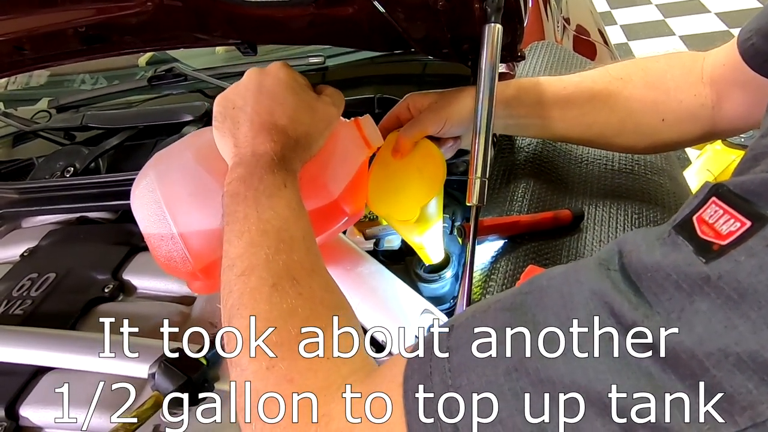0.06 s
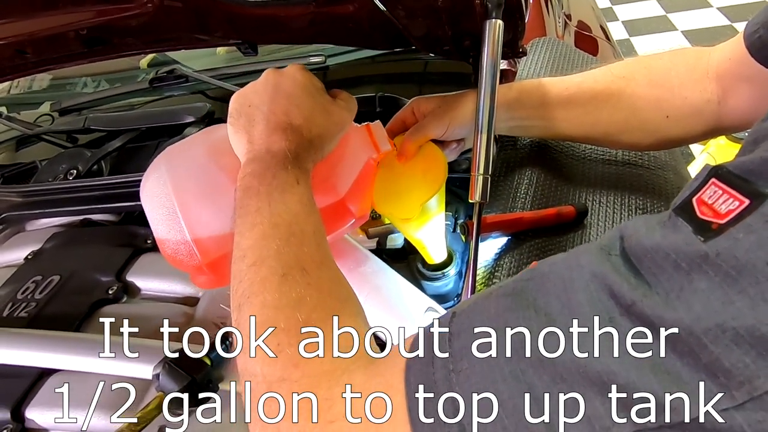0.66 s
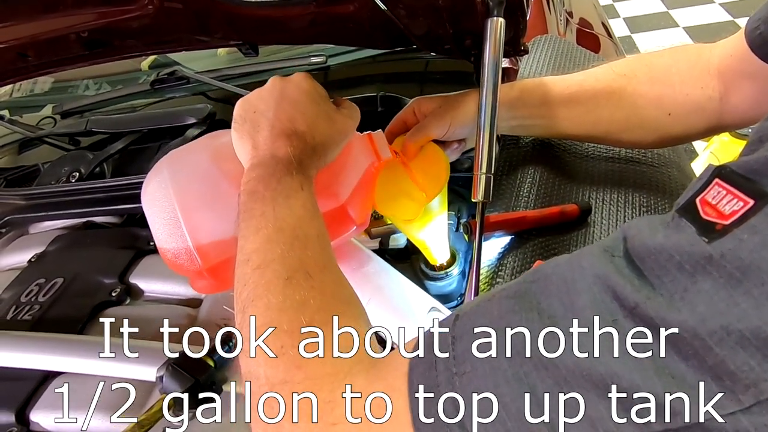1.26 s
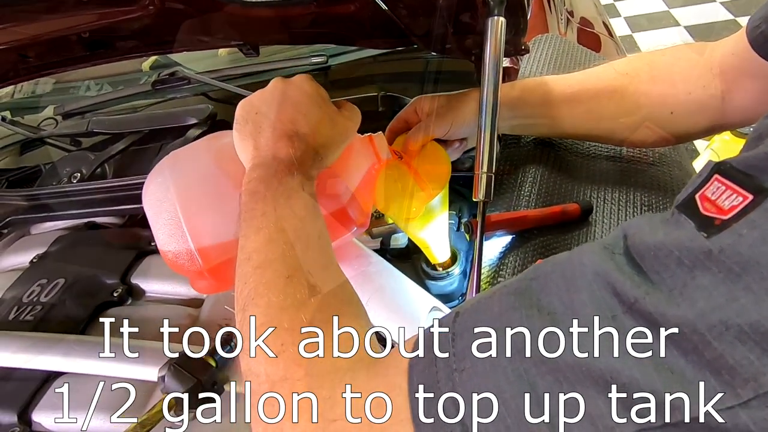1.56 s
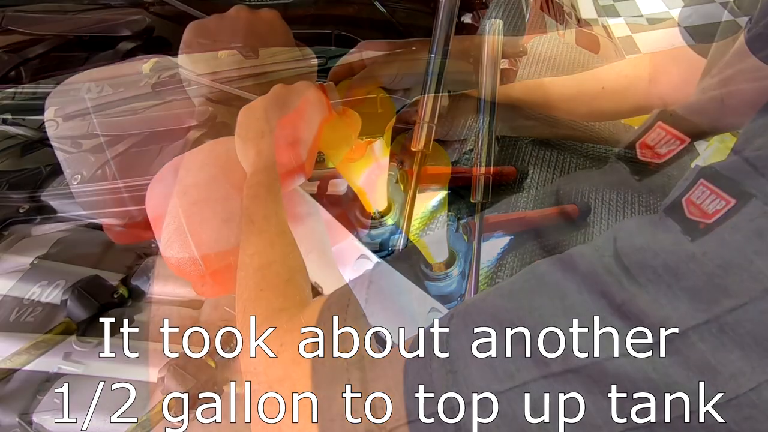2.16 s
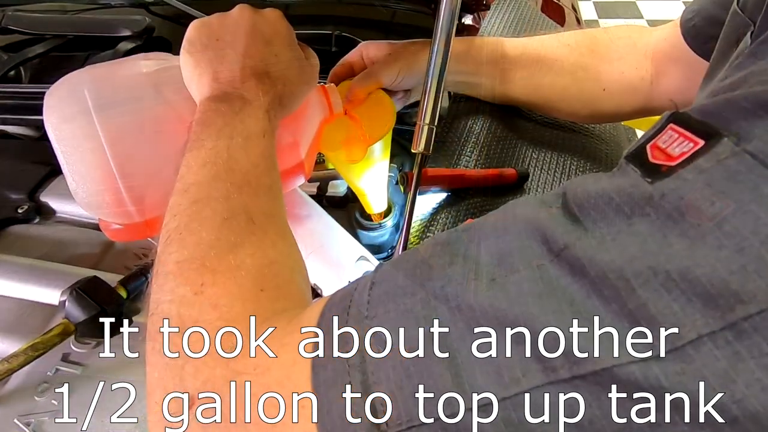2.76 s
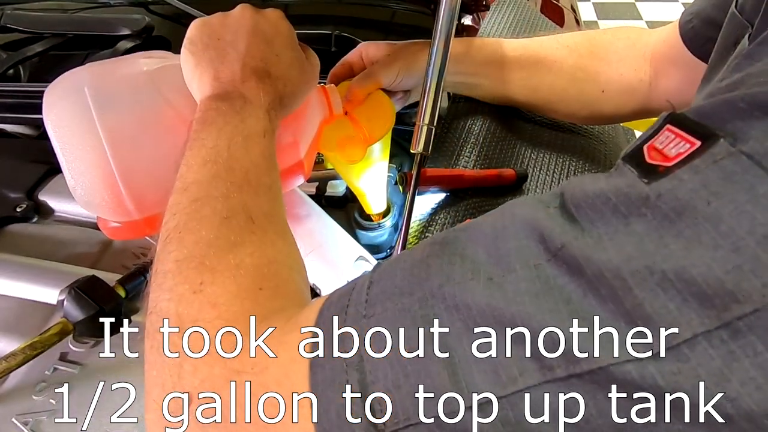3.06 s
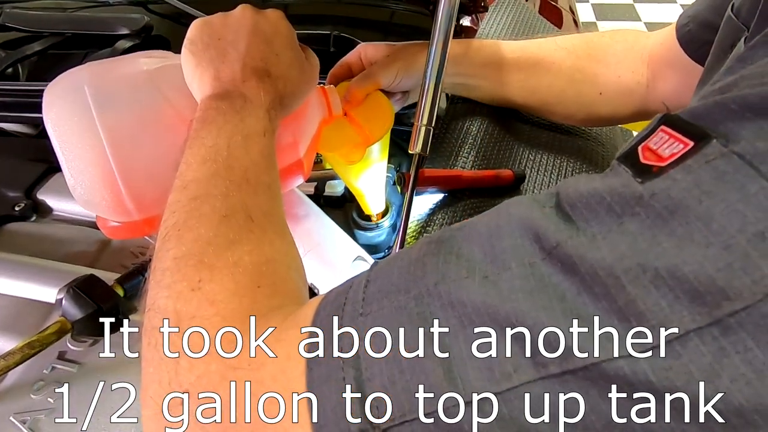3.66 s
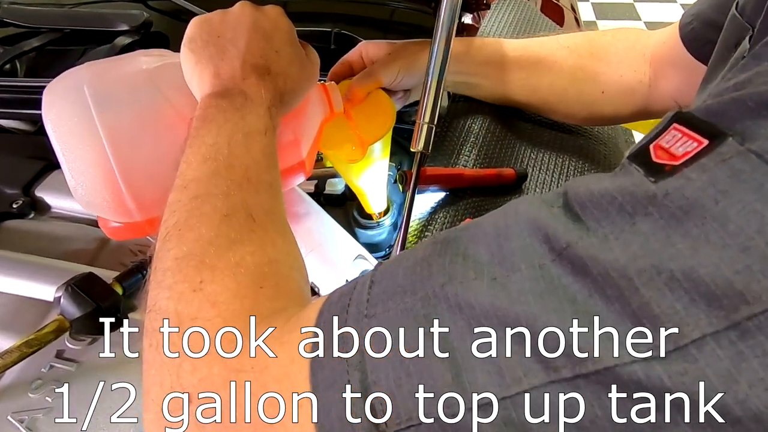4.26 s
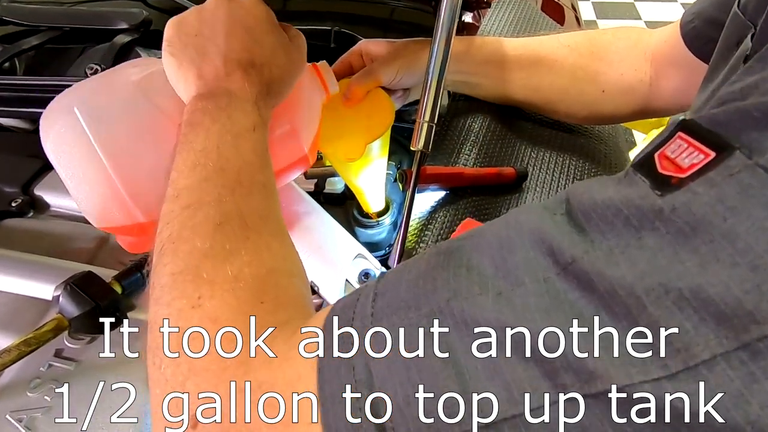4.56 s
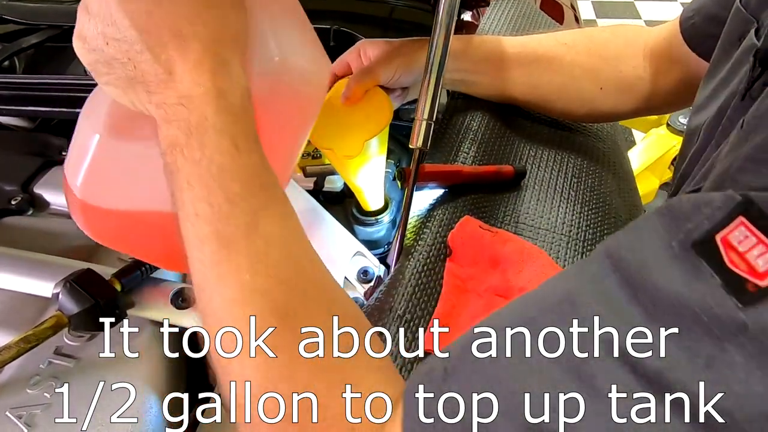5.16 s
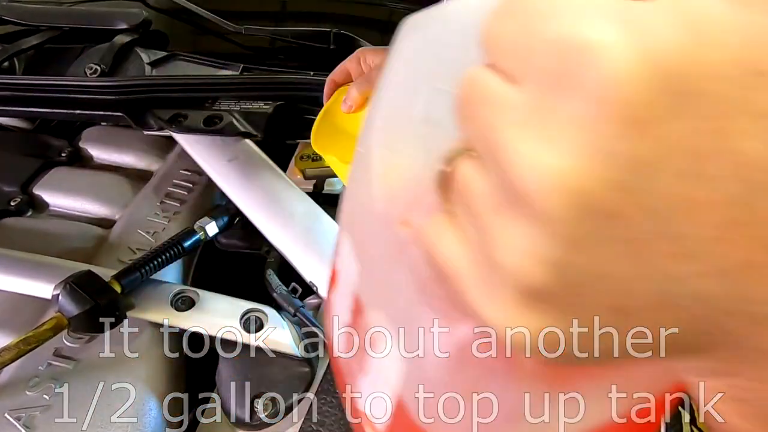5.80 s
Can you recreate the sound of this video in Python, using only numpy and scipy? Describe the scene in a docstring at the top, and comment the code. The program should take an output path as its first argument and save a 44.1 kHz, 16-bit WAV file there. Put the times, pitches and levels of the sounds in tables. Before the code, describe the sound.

Coolant pours through a plastic funnel with small splashes, bubbles and gulps of air, then dribbles out in a humming garage.

```python
"""Pouring coolant in a garage

In a humming garage, a plastic jug knocks on a funnel and coolant runs into an engine's tank.
The stream splashes and sheds small ringing bubbles, air gulps back up the filler neck,
and the hollow tank gurgles below. The pour ends in a few drips, a sleeve rubs,
and the jug bumps softly as it is lifted away."""
import sys
import numpy as np
from scipy import signal
from scipy.fft import rfft, irfft, next_fast_len
from scipy.io import wavfile
from scipy.ndimage import uniform_filter1d

SR = 44100
rng = np.random.default_rng(int(sys.argv[2]) if len(sys.argv) > 2 else 0)


def put_to_file(sound):
    """Save the sound as 16-bit audio at rate SR, in the file named by the first command-line argument."""
    columns = np.atleast_2d(sound).T  # one column per channel
    safe = np.clip(columns, -1, 1)
    whole_steps = np.round(safe * 32767)
    wavfile.write(sys.argv[1], SR, whole_steps.astype(np.int16))


N = 261591
TIME = np.arange(N) / SR
POUR_START_S, POUR_END_S = 1.095, 4.30


def from_db(db):
    """Turn decibels into a gain to multiply by."""
    return 10 ** (np.asarray(db) / 20)


def rms_one(x):
    """Scale a sound so that its average level (rms) is 1."""
    return x / np.sqrt(np.mean(x ** 2) + 1e-20)


def in_time(rows):
    """Join rows that start with a time into smooth curves, one for each further column."""
    s, *columns = np.transpose(rows)
    return [np.interp(TIME, s, column) for column in columns]


def at_hz(spectrum, hz):
    """Read the gain at any pitch from rows of pitch and dB."""
    row_hz, db = np.transpose(spectrum)
    return from_db(np.interp(np.log(hz + 1e-9), np.log(row_hz), db))


def colour(x, spectrum):
    """Make some pitches of a sound stronger than others; the level comes out at 1."""
    size = next_fast_len(N)
    gains = at_hz(spectrum, np.fft.rfftfreq(size, 1 / SR))
    return rms_one(irfft(rfft(x, size) * gains, size)[:N])


def noise(spectrum):
    """Smooth noise of a given colour."""
    return colour(rng.standard_normal(N), spectrum)


def add(track, s, sound):
    """Mix a sound into a track, starting at s seconds."""
    i = int(np.clip(s * SR, 0, len(track) - 1))
    track[i:i + len(sound)] += sound[:len(track) - i]


def ping(hz, t60, attack_s, rise=0):
    """A tone that fades by 60 dB in t60 seconds while its pitch climbs by the share `rise`."""
    t = np.arange(int(t60 * SR) + 8) / SR
    shape = (1 - np.exp(-(t / attack_s) ** 2)) * from_db(-60 * t / t60)
    return shape / shape.max() * np.sin(2 * np.pi * hz * t * (1 + .5 * rise * t / t60))


def swell(s, attack_s, hold_s, t60):
    """A loudness curve that rises, holds at 1 and dies away."""
    age = TIME - s
    rise = np.clip(age / attack_s, 0, 1) ** 2
    return rise * from_db(-60 * np.clip((age - attack_s - hold_s) / t60, 0, 3))


def wobble(spread_db, span_s):
    """A gain that wanders at random."""
    drift = uniform_filter1d(rng.standard_normal(N), int(span_s * SR))
    return from_db(spread_db * rms_one(drift))


def even(x, span_s):
    """Even out slow changes in loudness but keep the fine grain."""
    power = np.abs(uniform_filter1d(x ** 2, int(span_s * SR)))
    return x / np.sqrt(power + 0.00089 * np.mean(x ** 2))


def resonance(x, hz, width_hz):
    """Make a sound ring at one pitch; a narrower width rings longer."""
    r = np.exp(-np.pi * width_hz / SR)
    feedback = [1, -2 * r * np.cos(2 * np.pi * hz / SR), r * r]
    return signal.lfilter(np.array([1, 0, -1]) * (1 - r * r) / 2, feedback, x + 1e-18)


def gliding(x, hz, width_hz):
    """A resonance whose pitch follows a curve."""
    turn = np.exp(2j * np.pi * np.cumsum(hz) / SR)
    r = np.exp(-np.pi * width_hz / SR)
    return (turn * signal.lfilter([1 - r], [1, -r], x / turn)).real


def impacts(per_s, spread_db):
    """Clicks at random times: many small, a few large."""
    sizes = from_db(spread_db * np.minimum(rng.exponential(1, N), 4)) * rng.choice([-1, 1], N)
    return sizes * (rng.random(N) < per_s / SR)


# The colour of the ventilation. Each row: pitch in Hz, relative level in dB.
RUMBLE_COLOUR = [(18, -37), (30, -12), (40, -2), (80, -4.5), (125, -0.5), (170, -6.5), (240, -16.5),
                 (320, -19), (420, -34), (600, -39), (1000, -41.5), (1600, -51.5), (3000, -57.5),
                 (12500, -62), (14000, -81)]


def garage():
    """Ventilation rumbles, and a motor's hum sinks for a moment midway."""
    hum_hz, harmonics_db = 59.14, [-46.5, -55.5]
    hum = sum(from_db(db) * np.sqrt(2) * np.sin(2 * np.pi * (k * hum_hz * TIME + rng.random()))
              for k, db in enumerate(harmonics_db, 1))
    lull_s, lull_width_s, lull_db = 2.24, 0.5, -8
    lull = from_db(lull_db * np.exp(-((TIME - lull_s) / lull_width_s) ** 2))
    return lull * hum + from_db(-48) * noise(RUMBLE_COLOUR)


# The jug hits the funnel and rebounds. Each row: start in seconds, relative level in dB.
JUG_KNOCKS = [(0.337, -28), (0.349, -31.5)]
# The notes of the plastic. Each row: pitch in Hz, relative level in dB, fade time in seconds.
PLASTIC_NOTES = [(214.3, -8, 0.14), (322, -16, 0.15), (494, -2, 0.0063), (700, -3, 0.021),
                 (820, 1.5, 0.012), (956, 2, 0.017), (1098, -3.5, 0.02), (1265, -14.5, 0.016),
                 (3200, -19, 0.015)]
# Two light, dry ticks after the pour. Each row: start in seconds, relative level in dB.
LIGHT_TICKS = [(4.755, -45.5), (5.56, -45)]


def jug():
    """The spout knocks and the heavy jug rocks with a thud; later come two faint ticks."""
    out, t = np.zeros(N), np.arange(SR // 20) / SR
    crack_band = signal.butter(2, [2500, 6000], "band", fs=SR, output="sos")
    for s, db in JUG_KNOCKS:
        crack = signal.sosfilt(crack_band, rng.standard_normal(len(t)))
        add(out, s, from_db(db - 15) * crack * from_db(-60 * t / 0.012))
        for k, (hz, note_db, t60) in enumerate(PLASTIC_NOTES):
            add(out, s, (-1) ** k * from_db(db + note_db) * ping(hz, t60, attack_s=0.00013))
    thud = from_db(-32) * ping(hz=44.3, t60=.22, attack_s=0.027)
    add(out, JUG_KNOCKS[0][0] + 0.013, thud)
    for s, db in LIGHT_TICKS:
        tick = signal.lfilter([.4], [1, -.6], rng.standard_normal(len(t)))
        add(out, s, from_db(db) * tick * from_db(-60 * t / 0.0038))
    return out


def pouring():
    """A curve that is 1 while liquid runs; it starts at once and dribbles out."""
    return swell(POUR_START_S, attack_s=0.0073, hold_s=POUR_END_S - POUR_START_S, t60=1)


def bubbles(spectrum, per_s, cycles, spread_db, rise):
    """Bubbles form at random and ring; `rise` lifts their pitch as they near the surface."""
    pour_s = POUR_END_S - POUR_START_S
    when, pitch, force, life = rng.random((4, 4096))[:, :int(per_s * pour_s)]
    low_hz, high_hz = spectrum[0][0], spectrum[-1][0]
    hz = low_hz * (high_hz / low_hz) ** pitch
    gain = at_hz(spectrum, hz) * from_db(spread_db * np.minimum(-np.log(force), 4))
    turns = cycles * (.5 + life)
    length = (turns / hz * SR).astype(int)
    k = np.repeat(np.arange(len(hz)), length)   # the bubble that each sample belongs to
    age = np.arange(len(k)) - (np.cumsum(length) - length)[k]
    spent = age / length[k]
    # each swells over its first cycles, then dies away
    shape = (1 - np.exp(-(spent * turns[k] / 4.3) ** 2)) * np.exp(-np.log(100) * spent)
    wave = gain[k] * shape * np.sin(2 * np.pi * turns[k] * spent * (1 + rise * life[k] * spent))
    born = ((POUR_START_S + when * pour_s) * SR).astype(int)
    return np.bincount(born[k] + age, wave, N)[:N]


def spatter(spectrum, per_s, spread_db, t60):
    """Each droplet sets off the same short, noisy ring in the plastic."""
    t = np.arange(SR // 20) / SR
    ring = rng.standard_normal(len(t)) * from_db(-60 * t / t60)
    return colour(signal.fftconvolve(impacts(per_s, spread_db), ring)[:N], spectrum)


# The notes of the air in the funnel. Each row: pitch in Hz, width in Hz, relative level in dB.
FUNNEL_NOTES = [(1210, 54, -5), (2063, 33, -5.5), (2590, 86, -1), (2784, 62, 0.5), (3256, 80, 3.5),
                (3963, 120, 0.5), (4283, 110, -1.5), (4770, 110, -7), (6320, 170, -3), (7750, 190, 0)]


def funnel(x, ring_db):
    """The air in the cone rings along with any sound made inside it."""
    ring = sum(from_db(db) * resonance(x, hz, width) for hz, width, db in FUNNEL_NOTES)
    return x + from_db(ring_db) * ring


# The stream's strength. Each row: time in seconds, relative levels of splash and of spray in dB.
STREAM_LEVELS = [(1.2, -68.5, -83), (1.55, -70, -81.5), (1.88, -59.5, -80.5), (2.11, -55, -71),
                 (2.33, -55, -75.5), (2.7, -66, -82.5), (3.14, -72.5, -87), (4.13, -74.5, -86.5)]
# The colours of the splash and of the fine spray. Each row: pitch in Hz, relative level in dB.
SPLASH_COLOUR = [(1050, -11), (1600, -5), (2300, -4.5), (3300, 1), (4300, 7.5), (6000, 6), (7500, -30)]
SPRAY_COLOUR = [(5000, -47), (6200, -16.5), (8200, 0.5), (11500, -1.5), (15500, -13)]
# Liquid spurts over the jug's lip. Each row: start in seconds, length in seconds, level in dB.
SPURTS = [(1.153, 0.056, -56), (1.295, 0.0072, -53), (1.351, 0.048, -58), (1.449, 0.058, -58.5),
          (1.582, 0.094, -59), (1.758, 0.015, -57), (1.816, 0.014, -59), (2.557, 0.044, -64.5),
          (2.854, 0.1, -64.5), (3.4, 0.046, -66), (3.748, .08, -68.5), (4.018, 0.12, -69.5)]


def stream():
    """The stream hits the funnel: bubbles pop and plink in the pool, spray fizzes and patters."""
    plinks = rms_one(bubbles(SPLASH_COLOUR, per_s=850, cycles=46, spread_db=4, rise=.005))
    pops = rms_one(bubbles(SPLASH_COLOUR, per_s=1300, cycles=10, spread_db=4, rise=0))
    fizz = rms_one(bubbles(SPRAY_COLOUR, per_s=850, cycles=36, spread_db=6, rise=.02))
    patter = spatter([(1000, -9), (4000, 0), (8000, -2), (15000, -22)], per_s=420, spread_db=6, t60=.028)
    splash = even(funnel(.7 * plinks + pops, ring_db=12), span_s=0.06)
    spray = even(funnel(.6 * fizz + patter, ring_db=0), span_s=.07)
    spurts = sum(from_db(db) * swell(s, attack_s=0.0076, hold_s=length, t60=0.024)
                 for s, length, db in SPURTS)
    splash_db, spray_db = in_time(STREAM_LEVELS)
    splash_gain = np.hypot(from_db(splash_db - 2.5), spurts)   # hypot adds levels by their power
    spray_gain = np.hypot(from_db(spray_db + 7), from_db(-18) * spurts)
    flow = pouring() * wobble(spread_db=3.2, span_s=.022)
    return flow * (splash_gain * splash + spray_gain * spray)


# The strength of the gurgle. Each row: time in seconds, level in dB.
GURGLE_LEVELS = [(1.1, -72), (1.95, -62.5), (2.3, -52.5), (2.9, -59.5), (3.7, -57.5), (4.3, -72.5)]
# The notes of the hollow tank. Each row: pitch in Hz, width in Hz, relative level in dB.
TANK_NOTES = [(240.4, 18.4, 6.5), (306, 62, -3), (368.5, 65, 1)]
# Deep glugs. Each row: start in seconds, peak level in dB, starting pitch in Hz.
TANK_GLUGS = [(2.21, -37.5, 284), (2.46, -50, 287), (2.50, -37.5, 323), (2.529, -34.5, 287),
              (2.555, -33.5, 219), (2.806, -40, 372), (3.951, -44, 368)]


def tank():
    """Falling liquid drums on the hollow tank; now and then a large bubble glugs."""
    churn_colour = [(120, -2), (220, 1.5), (430, 0), (600, -11.5), (1500, -11.5), (4000, -13)]
    churn = colour(impacts(per_s=180, spread_db=3), churn_colour)
    body = sum(from_db(db) * resonance(churn, hz, width) for hz, width, db in TANK_NOTES)
    out = pouring() * from_db(in_time(GURGLE_LEVELS)[0]) * even(body, span_s=0.1)
    for s, db, hz in TANK_GLUGS:
        add(out, s, from_db(db) * ping(hz, t60=0.049, attack_s=0.001, rise=0.31))
    return out


# Single bubbles and drips. Each row: start in seconds, relative level in dB, rough pitch in Hz.
DRIP_NOTES = [(1.101, -41.5, 2640), (1.101, -43.5, 6060), (1.271, -41.5, 3830), (1.4799, -39.5, 4070),
              (1.463, -39.5, 5030), (1.669, -38, 4240), (1.7022, -39, 3300), (1.826, -38.5, 3520),
              (1.961, -41, 3490), (2.089, -37, 4000), (2.149, -34, 3120), (2.355, -41, 2590),
              (2.6107, -47, 1890), (2.936, -29.5, 3960), (2.992, -47, 3220), (3.05, -37, 2600),
              (3.2958, -42.5, 2660), (3.333, -43.5, 2030), (3.8027, -47, 4000), (4.2092, -41, 2080),
              (4.2373, -42, 2195), (4.493, -50, 4130), (4.697, -47.5, 5900), (4.8077, -58.5, 6000)]


def drips():
    """A drop traps a bubble that swells, rings briefly and stirs the cone around its own pitch."""
    out, t = np.zeros(N), np.arange(SR // 20) / SR
    shape = (1 - np.exp(-t / .002)) * from_db(-60 * t / .045)
    for s, db, hz in DRIP_NOTES:
        stir = resonance(rng.standard_normal(len(t)) * shape, hz, width_hz=950)
        add(out, s, from_db(db) * resonance(stir, hz, width_hz=2000))
        add(out, s, from_db(db - 4) * ping(hz * 0.983, t60=50 / hz, attack_s=0.0011, rise=0.28))
    return funnel(out, ring_db=-6)


def gulp(neck_hz, bubble_ratio, t60):
    """A big bubble breaks loose, rising in pitch, and sets the air in the neck ringing."""
    out = .36 * ping(neck_hz, t60, attack_s=.004)
    add(out, 0, .7 * ping(neck_hz * bubble_ratio, t60=0.05, attack_s=.004, rise=.12))
    return out


# The neck's note wanders up as the tank fills. Each row: time in seconds, pitch in Hz.
NECK_PITCH = [(1.15, 739.6), (2.75, 778.4), (3.36, 876), (3.6, 788), (3.98, 776), (4.2, 883)]
# Large gulps of air. Each row: start in seconds, relative level in dB.
AIR_GULPS = [(1.161, -35.5), (1.359, -47.5), (1.389, -40.5), (1.495, -31.5), (1.64, -36.5), (1.823, -41.5),
             (2.199, -40.5), (2.314, -39.5), (2.557, -31), (2.644, -45.5), (2.803, -44), (2.85, -48.5),
             (3.22, -45), (3.497, -41), (3.654, -41.5), (3.701, -41.5), (3.954, -41.5), (4.043, -39),
             (4.08, -45)]
# The width of the neck's note in Hz: first when clear, then when foamy.
NECK_WIDTHS = [18, 110]


def neck():
    """Air escapes up the filler neck in gulps trailed by small pulses; foam slowly damps the note."""
    clear_t60, foamy_t60 = .3, .07
    vent_end_s = 4.22   # air flows until the stream thins
    neck_hz, gulps = in_time(NECK_PITCH)[0], np.zeros(N)
    foam = np.clip((TIME - POUR_START_S) / (POUR_END_S - POUR_START_S), 0, 1)
    for (s, db), chance in zip(AIR_GULPS, rng.uniform(-0.7, 1, len(AIR_GULPS))):
        i = int(s * SR)
        t60 = clear_t60 * (foamy_t60 / clear_t60) ** foam[i]
        add(gulps, s - .002, from_db(db) * gulp(neck_hz[i], 1 + .07 * chance, t60))
    pulses = colour(impacts(per_s=300, spread_db=4), [(450, -24.5), (700, 1.5), (900, 2), (1300, -29)])
    clear, foamy = [even(gliding(pulses, neck_hz, width), span_s=0.13) for width in NECK_WIDTHS]
    ringing = np.sqrt(1 - foam) * clear + np.sqrt(foam) * foamy
    # the neck rings softly while air flows, and each gulp stirs it up
    soft = from_db(-67) * wobble(spread_db=3, span_s=0.031)
    stirred = sum(from_db(db - 19.5) * swell(s, attack_s=0.0053, hold_s=0.0098, t60=0.39)
                  for s, db in AIR_GULPS)
    venting = swell(POUR_START_S, attack_s=0.0097, hold_s=vent_end_s - POUR_START_S, t60=0.22)
    return gulps + venting * np.hypot(soft, stirred) * ringing


# Drops slap the funnel wall. Each row: start in seconds, relative level in dB.
WALL_SPLATS = [(1.8821, -50.5), (1.972, -44.5), (2.1984, -40.5), (2.293, -41.5), (2.3136, -38),
               (2.4164, -41.5), (2.454, -41.5), (2.5037, -48), (2.5354, -44), (2.6683, -48.5),
               (2.861, -49.5), (3.095, -51.5), (3.2975, -46), (3.464, -50.5), (4.0823, -47.5)]


def splats():
    """Each drop that hits the wall bursts into a short, bright crackle with a colour of its own."""
    centre_hz, spread_octaves, width_hz = 5140, 0.25, 4200
    out, t = np.zeros(N), np.arange(SR // 20) / SR
    shape = (1 - np.exp(-(t / .002) ** 2)) * from_db(-60 * t / .034)
    for s, db in WALL_SPLATS:
        hz = centre_hz * 2 ** (spread_octaves * np.clip(rng.standard_normal(), -2, 2))
        hiss = resonance(rng.standard_normal(len(t)), hz, width_hz)
        crackle = rms_one(resonance(hiss, hz, 2 * width_hz))
        add(out, s - .0015, from_db(db - 4) * shape * crackle)
    return funnel(out, ring_db=-3.5)


# The colours of the sleeve's rub and of its scuff. Each row: pitch in Hz, relative level in dB.
RUB_COLOUR = [(120, -36), (240, 3), (350, 2), (515, -3), (620, -9.5), (870, -9), (1400, -41), (3500, -57),
              (4700, -27.5), (9000, -73)]
SCUFF_COLOUR = [(400, 0.5), (1000, -13), (1800, -23), (4700, -38.5), (15000, -78)]
# The rub's hollow note. Each row: time in seconds, pitch in Hz.
RUB_PITCH = [(4.51, 530), (4.59, 340)]


def sleeve():
    """Cloth drags unevenly over the fender mat with a sinking note, then catches and slips once."""
    drag = from_db(-45.5) * swell(4.39, attack_s=0.093, hold_s=0.14, t60=0.53)
    hollow = rms_one(gliding(noise(RUB_COLOUR), in_time(RUB_PITCH)[0], width_hz=70))
    grain = wobble(spread_db=2, span_s=0.0069)
    rub = drag * grain * rms_one(noise(RUB_COLOUR) + hollow)
    catch = from_db(-39.5) * swell(4.633, attack_s=0.0075, hold_s=0.016, t60=0.078)
    return rub + catch * noise(SCUFF_COLOUR)


# The colour of the jug's bump. Each row: pitch in Hz, relative level in dB.
BUMP_COLOUR = [(200, -3), (350, -4), (650, -15), (1300, -15.5), (12000, -58)]


def bump():
    """The lifted jug gives a soft, hollow knock."""
    return from_db(-48.5) * swell(5.826, attack_s=0.0075, hold_s=0, t60=.2) * noise(BUMP_COLOUR)


def reflections(x, near_db, near_t60, far_db, far_t60):
    """Quick echoes off the open hood and engine, then the dull, faint tail of the garage."""
    t = np.arange(SR // 2) / SR
    near, far = rng.standard_normal((2, len(t)))
    near = near * from_db(-60 * t / near_t60) * (t > .003)
    far = signal.sosfilt(signal.butter(2, 1600, fs=SR, output="sos"), far)
    far = far * from_db(-60 * t / far_t60) * (t > .012)
    echo = from_db(near_db) * near / np.linalg.norm(near) + from_db(far_db) * far / np.linalg.norm(far)
    return signal.fftconvolve(x, echo)[:N]


def scene():
    """All the sounds together, heard from above the engine."""
    pour = stream() + splats() + drips() + neck() + tank() + jug() + bump()
    echoes = reflections(pour, near_db=-9.5, near_t60=0.08, far_db=-22.5, far_t60=0.45)
    return (pour + echoes + sleeve() + garage())[None]


def record(dry):
    """Cut away the very highest treble."""
    cutoff_hz = 15650
    return signal.sosfilt(signal.ellip(10, .1, 80, cutoff_hz, fs=SR, output="sos"), dry)


dry = scene()
out = record(dry)
put_to_file(out)
```